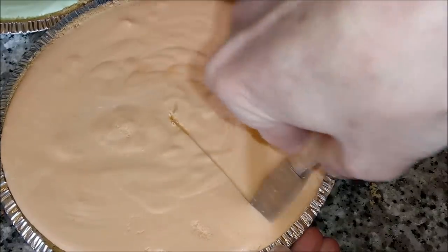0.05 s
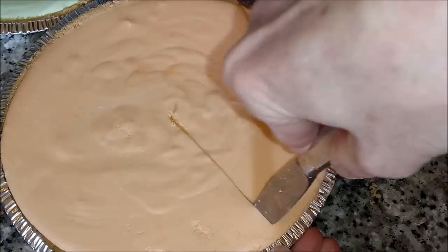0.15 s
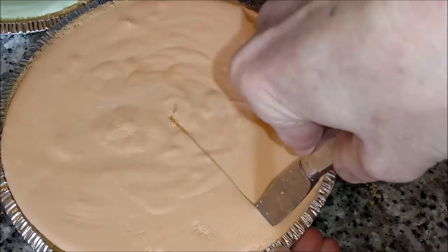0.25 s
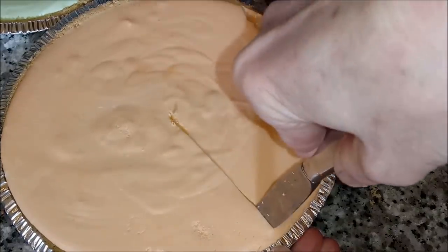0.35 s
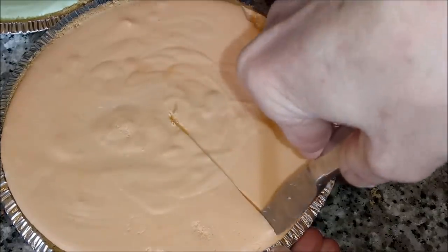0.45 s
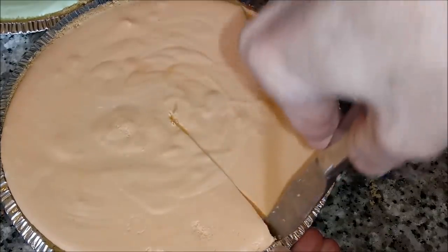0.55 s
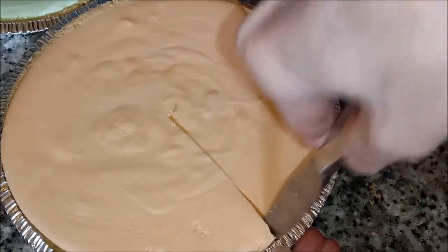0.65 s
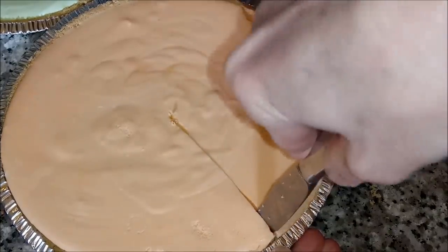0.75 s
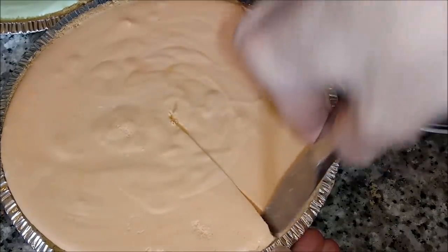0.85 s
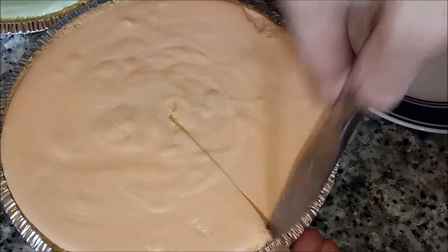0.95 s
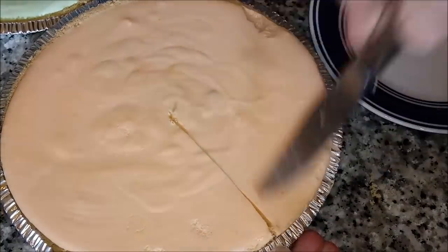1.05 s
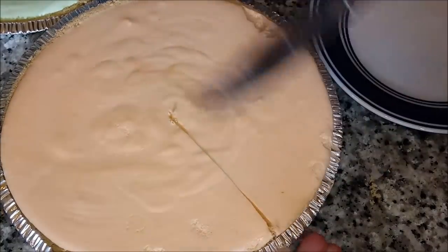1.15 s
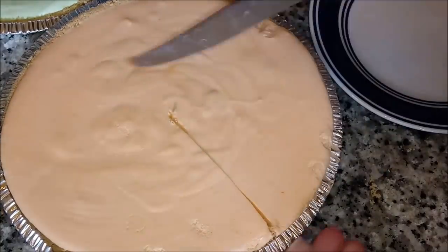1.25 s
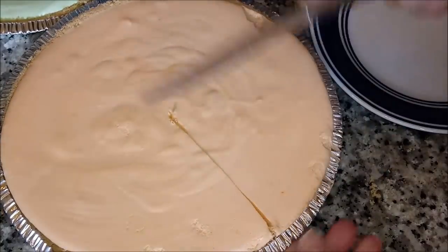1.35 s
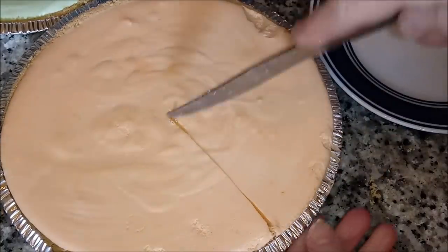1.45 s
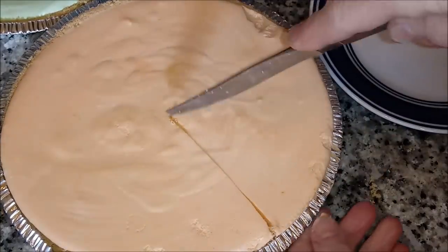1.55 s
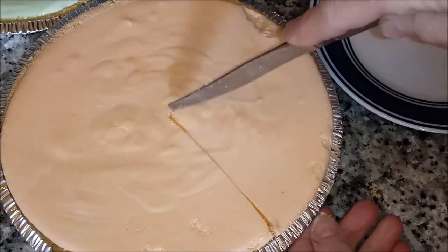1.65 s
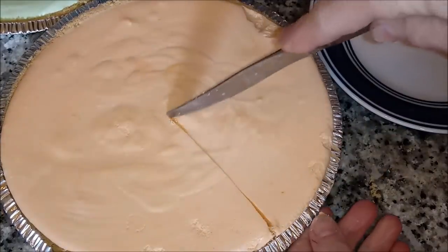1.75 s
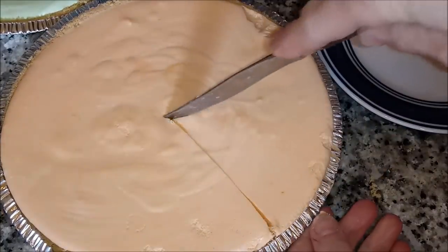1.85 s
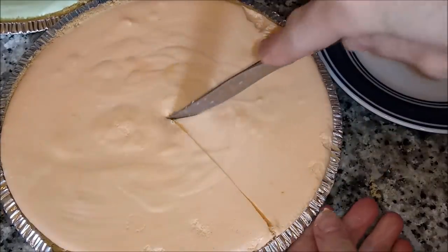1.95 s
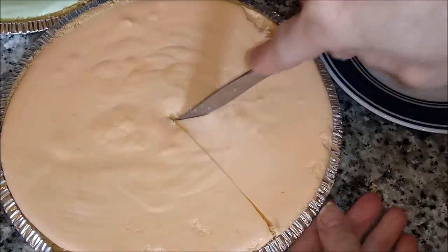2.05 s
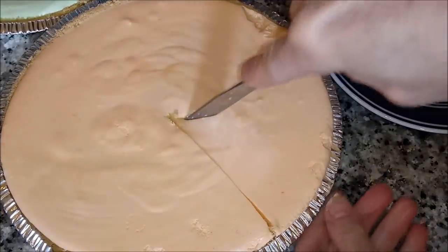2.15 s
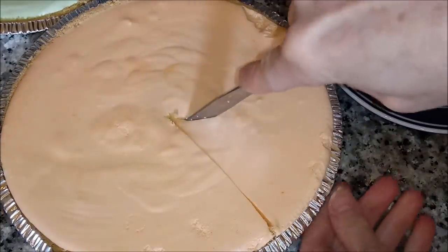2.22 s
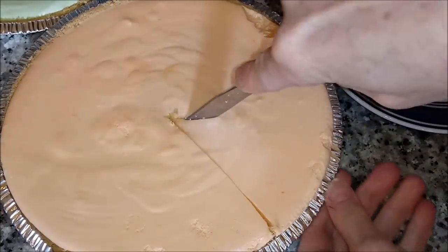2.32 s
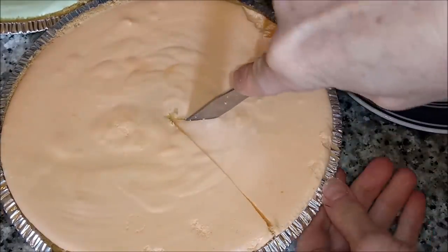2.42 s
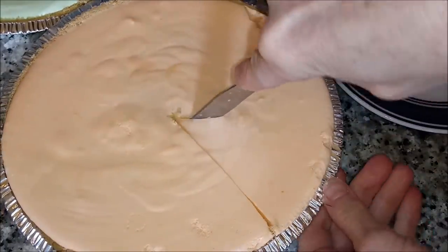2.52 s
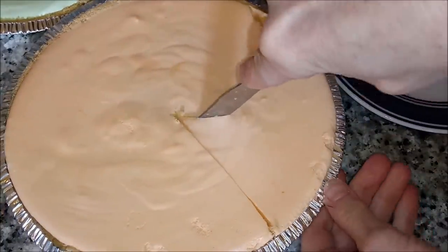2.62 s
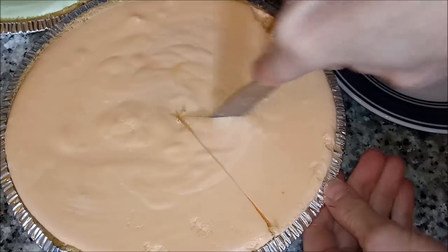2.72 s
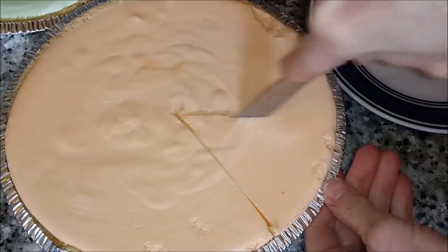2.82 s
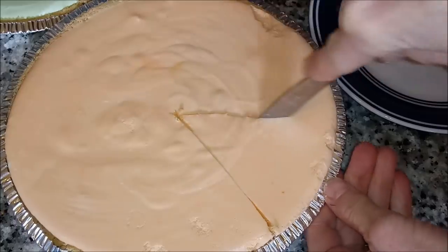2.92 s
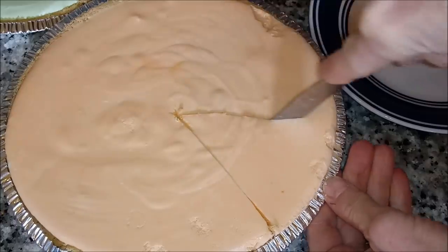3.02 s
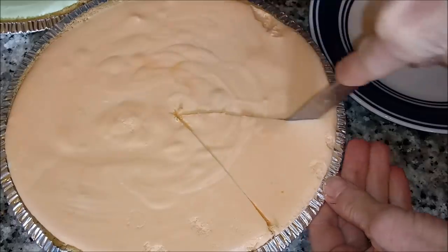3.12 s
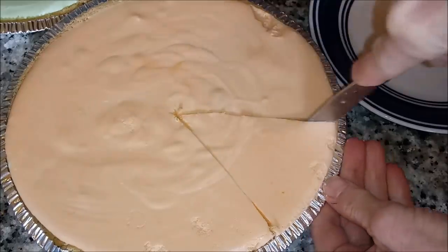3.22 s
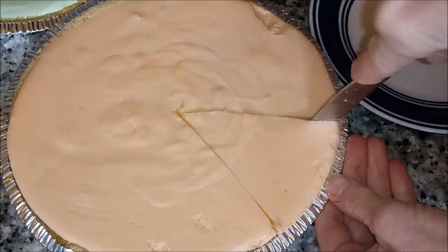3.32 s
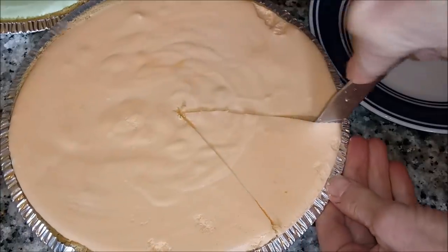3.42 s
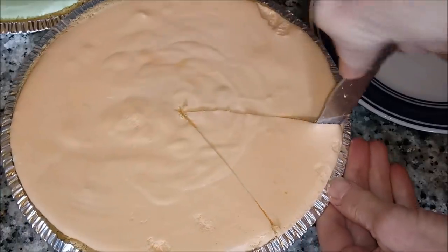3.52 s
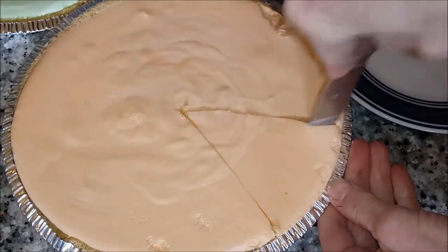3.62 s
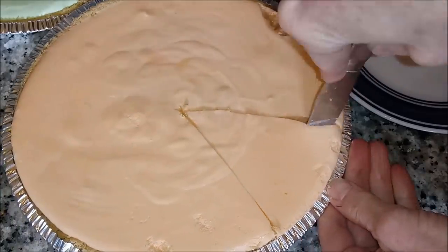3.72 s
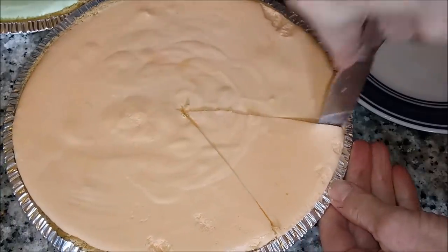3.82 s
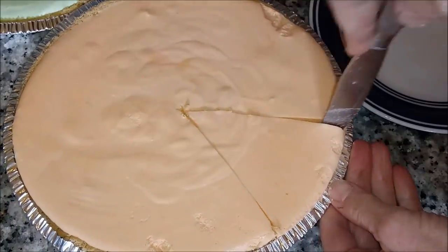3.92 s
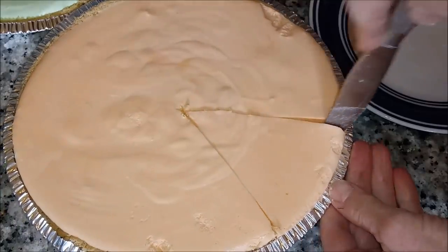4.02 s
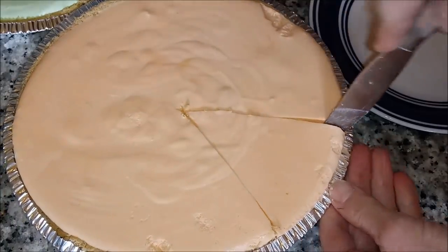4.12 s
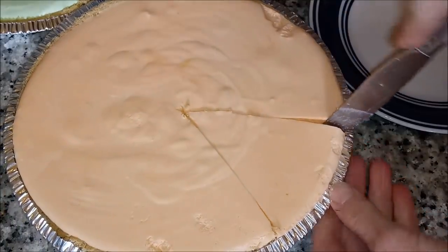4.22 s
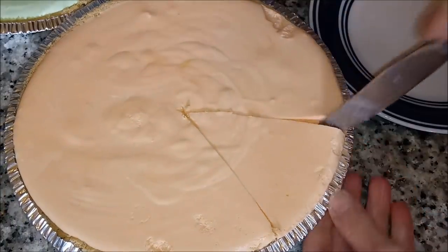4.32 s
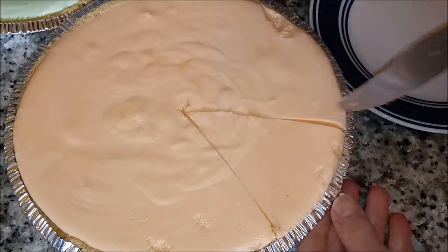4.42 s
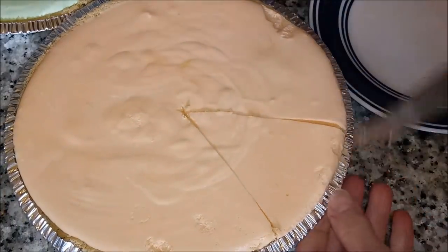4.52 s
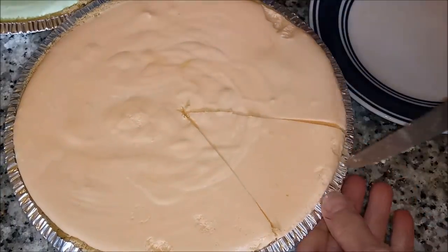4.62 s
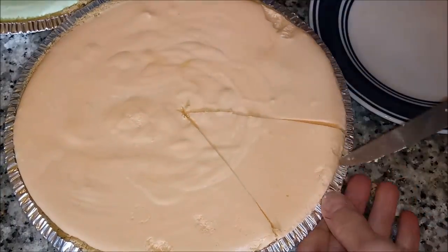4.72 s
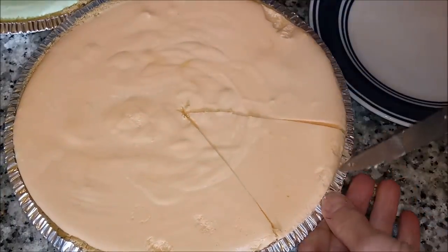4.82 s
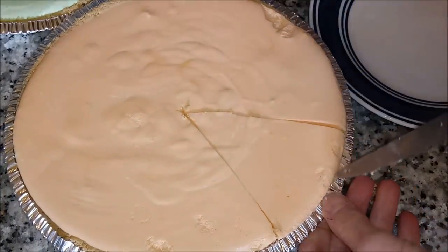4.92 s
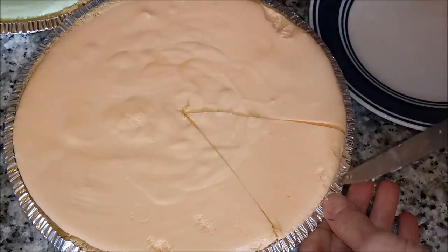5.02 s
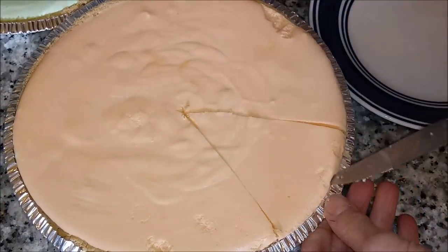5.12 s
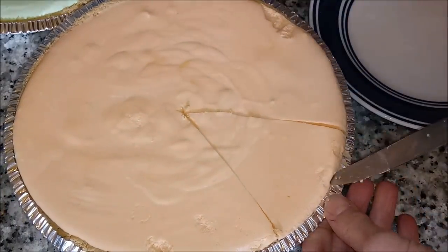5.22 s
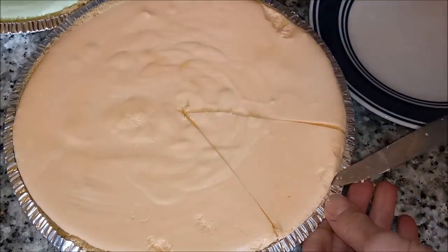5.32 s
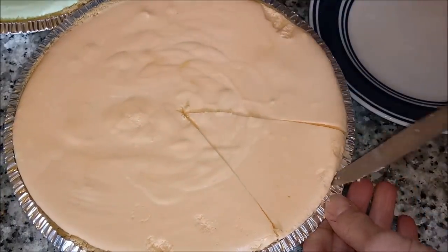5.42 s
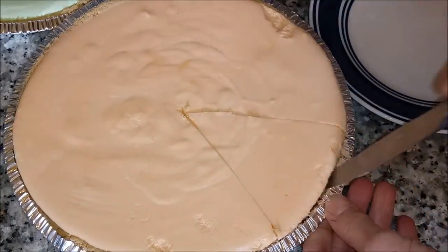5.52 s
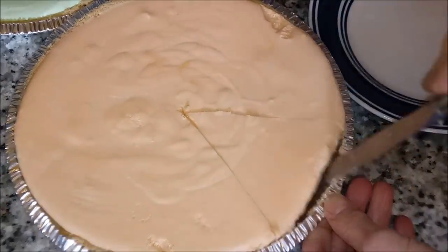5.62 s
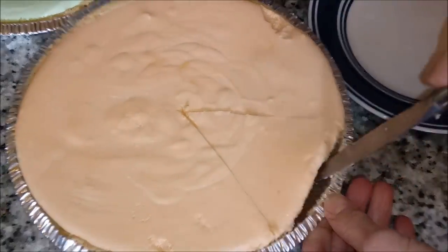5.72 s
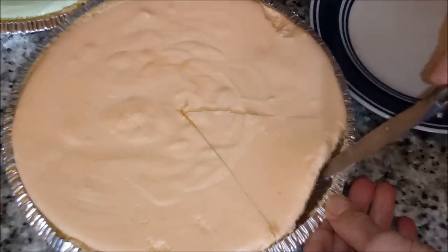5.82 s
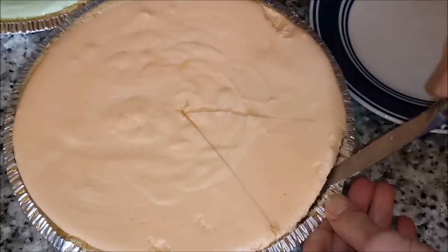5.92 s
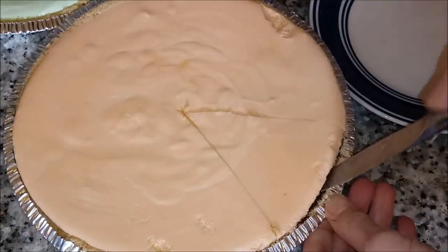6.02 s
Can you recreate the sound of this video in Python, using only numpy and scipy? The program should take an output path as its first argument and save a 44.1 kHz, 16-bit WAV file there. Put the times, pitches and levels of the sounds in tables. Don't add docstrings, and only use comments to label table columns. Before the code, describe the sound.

A table knife grinds through crumb crust in a foil tin, snapping and skipping over the crimped rim while a clock ticks in a small kitchen.

```python
import sys
import numpy as np
from scipy import signal
from scipy.fft import rfft, irfft
from scipy.io import wavfile
from scipy.ndimage import uniform_filter1d

SR = 44100
rng = np.random.default_rng(int(sys.argv[2]) if len(sys.argv) > 2 else 0)


def magnitude_from_level(level_db):
    exponent = np.asarray(level_db, float) / 20
    return 10 ** exponent


def to_wav(s):
    ch = np.atleast_2d(s).T
    pcm = np.round(np.clip(ch, -1, 1) * 32767)
    wavfile.write(sys.argv[1], SR, pcm.astype(np.int16))


N = 267113


def evened(x):
    return x / np.sqrt(np.mean(x ** 2) + 1e-20)


def read(points, hz):
    f, value = np.transpose(points)
    return np.interp(np.log(hz + 1), np.log(f + 1), value)


def add(mix, s, sound):
    part = mix[round(s * SR):][:len(sound)]
    part += sound[:len(part)]


def butter(x, order, hz, kind="low"):
    return signal.sosfilt(signal.butter(order, hz, kind, fs=SR, output="sos"), x)


def resonate(x, hz, width_hz):
    turn = np.exp(2j * np.pi * np.cumsum(hz * np.ones(len(x))) / SR)
    r = np.exp(-np.pi * width_hz / SR)
    smooth = signal.lfilter([(1 - r) ** 2], [1, -2 * r, r * r], x / turn)
    return 2 * (turn * smooth).real


def resonances(x, modes):
    return sum((-1) ** k * magnitude_from_level(db) * resonate(x, hz, width_hz)
               for k, (hz, width_hz, db) in enumerate(modes))


def crumbs(per_s, spread_db, smooth):
    size = magnitude_from_level(spread_db * np.minimum(rng.exponential(1, N), 4))
    size = size * (rng.random(N) < per_s / SR)
    return evened(size * rng.standard_normal(N)) + smooth * rng.standard_normal(N)


def flutter(depth_db, size):
    slow = uniform_filter1d(uniform_filter1d(rng.standard_normal(N), size), size)
    return magnitude_from_level(depth_db * evened(slow))


def swell(start, length, db, rise_db_per_s, fall_db_per_s):
    t = np.arange(0, N + 64, 64)[:, None] / SR
    early_s, late_s = np.maximum(start - t, 0), np.maximum(t - start - length, 0)
    return magnitude_from_level(db - rise_db_per_s * early_s - fall_db_per_s * late_s)


def joined(gains, rest_db):
    power = (gains ** 2).sum(1) + magnitude_from_level(rest_db) ** 2
    return np.interp(np.arange(N), np.arange(len(power)) * 64, np.sqrt(power))


def bursts(rows, drive, fade):
    out = np.zeros(N)
    for s, length_s, hz, width_hz, db in rows:
        start = round(s * SR)
        band = resonate(drive[start:start + SR // 2], hz, width_hz)
        band = evened(band[:round(length_s * SR)])
        add(out, s, magnitude_from_level(db) * band * signal.windows.tukey(len(band), fade))
    return out


def patchy(x, depth_db, wide, long):
    z = signal.stft(x, nperseg=1024, noverlap=768)[2]
    field = rng.standard_normal(z.shape[::-1]).T
    field = evened(uniform_filter1d(uniform_filter1d(field, wide, 0), long, 1))
    return signal.istft(z * magnitude_from_level(depth_db * field), nperseg=1024, noverlap=768)[1][:N]


def coloured(points):
    hz = np.fft.rfftfreq(N, 1 / SR)
    return evened(irfft(rfft(rng.standard_normal(N)) * magnitude_from_level(read(points, hz)), N))


# t/s, len/s, pressure/dB, depth on tin floor/dB, sliding speed/dB
FIRST_CUT_PUSHES = [(0, 0.019, -80, 8, 2), (0.117, 0.028, -57.5, -5.5, -3), (0.167, 0.014, -67.5, 1, 5),
                    (0.284, 0.17, -74, -24, -3), (0.52, .03, -62, -15.5, -5.5),
                    (0.57, 0.094, -57, -3.5, 1.5), (0.709, 0.031, -51.5, -8, 0), (0.787, 0.037, -56, 0, 1),
                    (0.972, 0.039, -57.5, -6.5, 0.5), (1.043, 0.058, -43, -19.5, -7.5),
                    (1.363, 0.064, -64, -38, -6), (1.461, 0.21, -75, -4, -11),
                    (2.039, 0.042, -76.5, -10.5, -2)]
# t/s, len/s, pressure/dB, depth on tin floor/dB, sliding speed/dB
SECOND_CUT_PUSHES = [(2.28, 0.038, -61.5, -12, -5), (2.36, 0.045, -65, -12, -6), (2.44, .1, -59.5, -3, -5),
                     (2.56, .2, -63, -4, -5), (2.784, 0.14, -60.5, -1, -2), (3.059, 0.11, -63, -2, -5.5),
                     (3.2, 0.013, -61.5, -12, 0), (3.24, 0.081, -63, 5, -3.5),
                     (3.3, 0.16, -62.5, -2.5, -1.5), (3.46, 0.26, -63.5, 1, -3.5),
                     (3.772, 0.0049, -60, 5, -7), (3.891, 0.068, -60, -4, -0.5), (4.08, 0.041, -67, 0.5, 1),
                     (4.17, 0.059, -64, -1, 0.5), (4.29, 0.22, -71, -9, -4.5)]
# t/s, len/s, pressure/dB, depth on tin floor/dB, sliding speed/dB
LIFT_PUSHES = [
    (4.5, 0.14, -73.5, -5.5, -4.5),
    (4.879, 0.05, -66, -3.5, -4.5),
    (4.96, 0.3, -69, -24, -7),
    (5.193, 0.1, -62.5, -8, -1),
    (5.29, 0.059, -63.5, -2.5, -2),
    (5.49, 0.048, -60, -21, -4),
    (5.583, 0.028, -52, -14, -2),
    (5.65, 0.022, -57.5, -5.5, 0),
    (5.807, 0.023, -48, -6, -2),
    (5.9, .2, -61, 0, -6.5),
]
# t/s, f/Hz
FLOOR_SPAN = [(0.1, 834), (0.601, 1076), (1.4, 1090), (2.3, 946), (2.75, 1074), (3.02, 811), (3.3, 825),
              (3.7, 1076), (4.12, 645), (4.3, 1022), (4.7, 977), (4.9, 600), (5.2, 910), (5.6, 1004),
              (5.8, 729), (6.0, 1025)]
# f/Hz, width/Hz, level/dB
FOIL_MODES = [(1395, 520, 2), (1770, 510, 3), (2120, 830, -1), (3400, 1300, -6.5)]
# f/Hz, width/Hz, level/dB
GRIT_MODES = [(4300, 1000, -2), (5300, 1000, 1.5), (6355, 960, -1), (9400, 3400, -10.5)]


def blade():
    pushes = FIRST_CUT_PUSHES + SECOND_CUT_PUSHES + LIFT_PUSHES
    start, length, db, depth_db, speed_db = np.transpose(pushes)
    push = swell(start, length, db, rise_db_per_s=326.5, fall_db_per_s=169)
    drum_hz = np.interp(np.arange(N) / SR, *np.transpose(FLOOR_SPAN))
    coarse, fine = crumbs(1500, 2.0, 0.94), crumbs(2500, 2.7, 1.0)
    grind = resonances(coarse, FOIL_MODES)
    grit = resonances(fine + 0.4 * coarse, GRIT_MODES)
    drum = resonate(crumbs(1400, 2.2, 0.93), drum_hz, 420)
    rest_db = -77.5
    out = joined(push, rest_db) * evened(grind)
    out += joined(push * magnitude_from_level(depth_db), rest_db - 11) * evened(drum)
    out += joined(push * magnitude_from_level(speed_db), rest_db + 0.5) * evened(grit)
    return flutter(0.75, size=500) * out


# t/s, len/s, level/dB
LEANS = [(0.21, 0.067, -79.5), (0.595, 0.15, -76.5), (0.853, 0.0091, -64), (1.026, 0.015, -88),
         (1.18, 0.085, -83), (1.493, 0.065, -88.5), (1.921, 0.088, -85), (2.273, 0.24, -71),
         (2.444, 0.16, -71.5), (2.6, 0.1, -76.5), (2.96, 0.034, -75), (3.3, 0.35, -78.5),
         (3.78, 0.0041, -70), (3.903, 0.13, -82.5), (4.072, 0.22, -72), (4.497, 0.16, -75.5),
         (4.735, 0.035, -81), (4.893, 0.0046, -57.5), (5.005, 0.26, -72.5), (5.228, 0.082, -65),
         (5.558, 0.12, -70.5), (5.815, 0.095, -58.5), (6.004, .06, -76)]


def leaning_hand():
    lean = swell(*np.transpose(LEANS), rise_db_per_s=349, fall_db_per_s=199)
    rumble = np.zeros(N)
    for hz, width_hz, db in ((100, 40, 0), (330, 290, -5.5), (155, 53, -7.5), (38, 25, -3.5)):
        rumble += magnitude_from_level(db) * resonate(rng.standard_normal(N), hz, width_hz)
    return joined(lean, rest_db=-89.5) * evened(rumble)


def stroke():
    return patchy(blade() + leaning_hand(), 2.8, wide=5, long=9)


# t/s, len/s, f/Hz, width/Hz, level/dB
COUNTER_KNOCKS = [
    (0, .35, 98, 20, -78),
    (1.03, .12, 380, 100, -64),
    (4.47, .13, 100, 25, -68),
    (4.84, .13, 48, 40, -61),
    (4.3, .5, 190, 70, -80),
    (3.6, .4, 150, 60, -80),
    (1.8, .5, 70, 50, -84),
    (5.2, .1, 150, 60, -70),
    (5.53, .07, 250, 50, -66),
    (5.74, .1, 380, 120, -62),
]


def thumps():
    return bursts(COUNTER_KNOCKS, rng.standard_normal(N), fade=0.86)


TICK_TIMES = [0.0328, 0.579, 1.6818, 2.2213, 2.78, 3.3405, 3.891, 4.4407, 4.9965, 5.5497]
TOCK_TIMES = [0.325, 0.8735, 1.4297, 1.9795, 2.5304, 3.082, 3.6262, 4.1775, 4.7306, 5.2834]
# f/Hz, width/Hz, level/dB
CLOCK_CASE = [(4800, 450, -6), (5133, 400, 4)]


def clock():
    t, out = np.arange(3000) / SR, np.zeros(N)
    tick_db, tock_db = -50.5, -53.5
    for s, db in [(s, tick_db) for s in TICK_TIMES] + [(s, tock_db) for s in TOCK_TIMES]:
        decay = magnitude_from_level(-60 * t / 0.05) + 0.12 * magnitude_from_level(-60 * t / 0.3)
        rattle = rng.standard_normal(3000) * decay * (1 - np.exp(-t / 0.001))
        rattle = 0.35 * rattle + np.roll(rattle, 260)
        beat = sum(magnitude_from_level(level_db) * resonate(rattle, hz, width_hz) for hz, width_hz, level_db in CLOCK_CASE)
        add(out, s - 0.0085, magnitude_from_level(db) * beat / abs(beat).max())
    return out


# t/s, len/s, f/Hz, width/Hz, level/dB
FOIL_RUBS = [(.073, 0.12, 675, 120, -55.5), (.074, 0.049, 940, 200, -57), (.125, 0.049, 6800, 700, -56),
             (.135, 0.046, 9100, 2500, -53), (1.372, 0.034, 1296, 70, -65), (1.37, .035, 1700, 250, -63),
             (4.63, .22, 3500, 1800, -75), (1.07, .06, 2250, 500, -46), (1.03, .035, 3000, 900, -40),
             (6.003, 0.0068, 3660, 2490, -40.5), (1.36, 0.34, 1258, 59.5, -78),
             (2.099, 0.23, 1230, 64.4, -72), (3.375, 0.086, 4300, 700, -55),
             (3.45, 0.086, 4400, 900, -62.5), (3.395, 0.063, 3380, 500, -64),
             (3.74, 0.034, 5860, 5100, -55.5), (3.79, .09, 4430, 3500, -84), (4.315, 0.02, 5300, 400, -59),
             (4.315, .012, 6500, 1500, -58), (4.72, 0.12, 1570, 400, -70), (4.86, 0.15, 3020, 750, -65.5),
             (5.195, 0.031, 7100, 3020, -56.5), (5.36, 0.27, 797, 120, -74.5),
             (5.576, 0.049, 6870, 500, -57.5), (5.58, 0.065, 10300, 8000, -53),
             (5.597, 0.025, 1540, 694, -39.5), (5.603, 0.0247, 3300, 895, -46),
             (5.6, 0.023, 5300, 700, -48), (5.583, 0.015, 1650, 400, -58), (5.782, 0.057, 640, 200, -53),
             (5.885, 0.024, 208, 120, -56), (.126, 0.052, 850, 260, -52.5), (3.025, 0.041, 900, 300, -63.5),
             (5.778, 0.072, 1760, 402, -48.5)]


def rubs():
    return bursts(FOIL_RUBS, rng.standard_normal(N), fade=0.3)


# t/s, len/s, f/Hz, width/Hz, level/dB
CRUST_CRUNCHES = [(.073, 0.096, 1320, 795, -60.5), (.13, 0.047, 1410, 1270, -53),
                  (.83, 0.033, 1470, 2940, -55), (1.37, 0.016, 1590, 2060, -68),
                  (2.285, 0.09, 1390, 1490, -56), (2.71, 0.046, 1260, 900, -65),
                  (2.885, 0.023, 1000, 700, -75), (3.0195, 0.01, 660, 500, -54.5),
                  (3.172, 0.079, 885, 1100, -56.5), (3.285, 0.065, 940, 920, -54),
                  (3.495, 0.027, 1300, 1660, -53), (3.763, 0.022, 700, 500, -52),
                  (3.775, .04, 300, 250, -58), (4.865, .07, 420, 350, -60), (3.88, 0.086, 1440, 1830, -66),
                  (4.07, 0.069, 476, 690, -62.5), (4.17, 0.02, 397, 302, -62.5),
                  (4.19, 0.042, 1720, 2420, -55.5), (5.27, 0.045, 2040, 910, -59),
                  (5.778, 0.021, 1500, 1200, -54), (5.84, 0.12, 1030, 1830, -52)]


def crunches():
    return bursts(CRUST_CRUNCHES, crumbs(1300, 2.4, 0.7), fade=0.59)


# t/s, peak/dB, ring f/Hz
FOIL_DENTS = [(0.079, -46, 910), (0.17, -36.5, 910), (0.939, -58, 1305), (2.242, -46.5, 1610),
              (2.283, -52, 1800), (2.295, -48, 2200), (2.45, -44, 1090), (2.714, -44, 1240),
              (2.896, -50, 1010), (3.196, -34.5, 825), (3.236, -44.5, 950), (3.256, -37, 750),
              (3.291, -37.5, 815), (3.89, -49, 1590), (3.924, -51, 1960), (4.228, -53, 1850),
              (5.722, -71, 1320), (5.783, -42, 1900), (5.794, -35.5, 1810)]
# t/s, peak/dB, ring f/Hz, crack re ring/dB, t60/s
CRUMB_CHIPS = [
    (0.137, -36.5, 920, -13, 0.0096),
    (0.67, -34, 940, 0.5, 0.018),
    (5.213, -25, 956, -7.5, 0.01),
    (5.586, -40.5, 1680, 2, .012),
    (5.615, -34.5, 1380, 1, 0.0089),
]
# t/s, peak/dB, ring f/Hz, crack re ring/dB, t60/s
CRUST_SNAPS = [(0.149, -38, 882, 2, 0.033), (0.397, -50, 1580, 7, 0.0089), (0.531, -50, 1490, -1, 0.012),
               (0.548, -45, 1900, -10, 0.0074), (0.554, -43, 1800, -16, 0.0019),
               (0.763, -25.5, 1300, -4.5, 0.0064), (0.839, -31, 1750, -6.5, 0.007),
               (.843, -33, 1150, -3, .007), (1.379, -54, 1700, -12, 0.012), (3.021, -50, 1820, -2, 0.018),
               (3.5, -45, 1440, -4, 0.019), (3.545, -41.5, 1050, 3.5, 0.012),
               (3.764, -28.5, 1066, -11, 0.0058), (4.172, -60, 1722, 3, 0.0078),
               (4.211, -36, 1900, 2, 0.005), (4.193, -50, 1900, 0, .008), (4.318, -55, 1890, 6.5, 0.014),
               (4.387, -49, 1500, -3, 0.008), (4.849, -55.5, 1650, 13, 0.0096),
               (5.427, -59.5, 1830, 4.5, 0.024), (5.497, -44.5, 965, -1, 0.019),
               (5.521, -27.5, 990, -12.5, 0.0072), (5.602, -33.5, 1620, -5, 0.0075),
               (2.615, -55, 2000, 9, 0.0045), (3.511, -46, 1510, -6, 0.0069),
               (3.626, -55.5, 1400, 6.5, .006), (4.442, -62, 1690, 0, 0.0088),
               (5.727, -53.5, 1900, 5.5, 0.0053), (5.757, -56.5, 1900, 8, 0.0044),
               (5.943, -54, 1900, 8, .005), (6.005, -32.5, 2300, 1, 0.0028), (1.362, -63, 1700, 0, 0.0091),
               (1.41, -58, 1820, -3, .01), (1.445, -65, 1610, 0, .01)]
# t/s, peak/dB, ring f/Hz, crack re ring/dB, t60/s
FOIL_NICKS = [
    (0.6855, -17, 1543, 6.5, 0.0056),
    (2.726, -47, 1510, 0.67, 0.017),
]
# t/s, peak/dB
RIM_CRIMPS = [(1.0257, -23), (1.0299, -18), (1.0343, -18), (1.0375, -11), (1.0409, -10), (1.0431, -12),
              (1.0452, -14), (1.0483, -12.5), (1.0507, -12), (1.0532, -20), (1.0562, -27), (1.0578, -25),
              (1.0601, -25), (1.0628, -25), (1.0668, -31), (1.0745, -30), (1.079, -30), (1.083, -31)]


def breaks():
    snap_edge_db, chip_edge_db, nick_edge_db = -43, -32, -14
    rows = [(s, db, hz, -17, 0.0098, snap_edge_db) for s, db, hz in FOIL_DENTS]
    for table, edge_db in ((CRUST_SNAPS, snap_edge_db), (CRUMB_CHIPS, chip_edge_db), (FOIL_NICKS, nick_edge_db)):
        rows += [(*row, edge_db) for row in table]
    freed_s = 1.052
    for s, db in RIM_CRIMPS:
        t60_s = 0.0033 + 0.12 * max(s - freed_s, 0)
        rows.append((s, db, 1780, -4.5, t60_s, -23.5 - 12 * (s > freed_s)))
    return rows


def snaps():
    t, out = np.arange(2000) / SR, np.zeros(N)
    rise = (1 - np.exp(-t / 0.0004)) ** 2
    for s, db, hz, crack_db, t60_s, edge_db in breaks():
        noise = rng.standard_normal(2000)
        decay = magnitude_from_level(-60 * t / t60_s)
        upper = 0.73 * np.clip((1400 - hz) / 400, 0, 1)
        second = np.sin(2 * np.pi * 2.1 * hz * t) - 0.5 * np.sin(2 * np.pi * 1.8 * hz * t)
        ring = (np.sin(2 * np.pi * hz * t) + upper * second) * decay * rise
        rattle = 20 * t60_s * evened(resonate(noise, hz, 1700)) * magnitude_from_level(-60 * t / (1.7 * t60_s)) * rise
        burst = (noise + 2.5 * (t == 0)) * decay
        crack = resonate(burst, 3610, 1900) - resonate(burst, 5760, 1700)
        crack += magnitude_from_level(-7.5) * resonate(burst, 9450, 2000) - magnitude_from_level(-7) * resonate(burst, 4600, 900)
        edge = resonate(burst, 10500, 2900) - magnitude_from_level(2.5) * resonate(burst, 15300, 2200)
        bright = magnitude_from_level(crack_db + 2) * crack / abs(crack).max()
        bright += magnitude_from_level(edge_db + 19) * edge / abs(edge).max()
        add(out, s, magnitude_from_level(db) * (ring / abs(ring).max() + rattle + bright))
    return butter(out, 3, 600, "high")


# f/Hz, level/dB, t60/s
TIN_MODES = [(945, -8, 0.21), (1181, -3.5, .15), (1457, -5.5, 0.13), (1611, -6, 0.17), (1750, -3.5, 0.095),
             (1855, -4, .16), (2015, -5, .14), (2196, -4, .12), (2410, 0, 0.11), (2620, -5, .1),
             (2895, -4, 0.076), (3300, -6, .06), (3720, -4.5, .07), (4700, -3.5, .07)]


def tin(hits):
    t = np.arange(8000)[:, None] / SR
    hz, db, t60_s = np.transpose(TIN_MODES)
    sign = (-1) ** np.arange(len(hz))
    decay = magnitude_from_level(-48.5 + db - 60 * t / t60_s) * (1 - np.exp(-t / 0.012))
    ring = (decay * np.sin(2 * np.pi * hz * t) * sign).sum(1)
    return signal.oaconvolve(hits, ring)[:N]


# f/Hz, t60/s
KITCHEN_DECAY = [(200, 0.25), (1000, 0.078), (2000, 0.14), (5000, 0.074), (9000, 0.077)]


def kitchen(x):
    taps = np.zeros(SR // 2)
    at = np.arange(120, SR // 2 - 20, 20)
    taps[at + rng.integers(0, 20, len(at))] = rng.choice([-1., 1.], len(at))
    hz, t, z = signal.stft(taps, SR, nperseg=256)
    decay = magnitude_from_level(-60 * t / read(KITCHEN_DECAY, hz)[:, None]) * (1 - np.exp(-t / 0.0037))
    tail = signal.istft(z * decay, SR, nperseg=256)[1]
    return signal.fftconvolve(x, tail / np.linalg.norm(tail))[:N]


# f/Hz, density/dB
HUSH_SPECTRUM = [(30, -28), (300, -20), (760, -11), (1300, -8), (1900, -0.5), (2800, -23), (5000, -16.5),
                 (6800, -28)]


def hush():
    return magnitude_from_level(-85) * patchy(coloured(HUSH_SPECTRUM), 3.6, wide=3, long=50)


# f/Hz, density/dB
HISS_SPECTRUM = [(6000, -7.5), (8000, -13.5), (12500, -10.5), (14000, -11.5), (15200, -1.5), (15750, -4),
                 (15900, -34)]


def microphone(x):
    capsule_hz, rumble_hz, edge_hz = 7200, 43.3, 16580
    x = butter(x, 2, rumble_hz, "high")
    x = butter(x, 8, capsule_hz) + magnitude_from_level(-17.5) * x
    hiss = magnitude_from_level(-86) * butter(coloured(HISS_SPECTRUM), 4, capsule_hz, "high")
    return signal.oaconvolve(x + hiss, signal.firwin(255, edge_hz, fs=SR)[None], "same")


# t/s, lowest surviving treble tone f/Hz
LOST_BLOCKS = [
    (.81, 4300),
    (1.11, 2700),
    (2.452, 2900),
    (2.54, 2700),
    (3.99, 4300),
    (5.055, 2500),
    (5.266, 4400),
    (5.8, 4200),
]


def stalls(x):
    out, hz = x.copy(), np.fft.rfftfreq(1152, 1 / SR)
    for s, lowest_hz in LOST_BLOCKS:
        comb = (hz - lowest_hz) / 640 % 1 < 0.2
        tones = comb * (hz > lowest_hz) * (hz < 6800)
        keep = np.where(hz < 2400, hz > 320, 1.7 * tones + 0.2)
        start = round(s * SR) - 576
        block = x[start:start + 1152] * np.hanning(1152)
        add(out, start / SR, irfft(rfft(block) * (keep - 1), 1152))
    return out


def scene():
    drag = stroke() + thumps() + rubs() + crunches()
    beats, hits = clock(), snaps()
    wet = magnitude_from_level(-12.5) * hits + magnitude_from_level(-2.5) * beats + magnitude_from_level(-10.5) * drag
    return (hits + beats + drag + tin(hits) + kitchen(wet) + hush())[None]


def top_cut(x):
    return signal.sosfilt(signal.butter(12, 16840, fs=SR, output="sos"), x)


def record(dry):
    mix = stalls(microphone(dry)[0])[None]
    return top_cut(mix)


dry = scene()
out = record(dry)
to_wav(out)
```